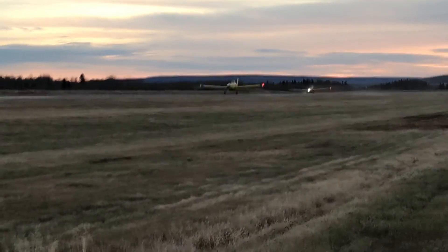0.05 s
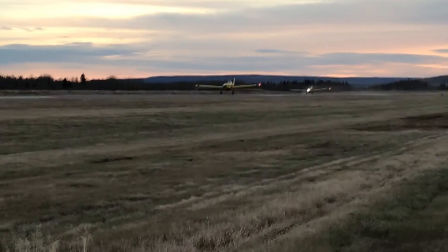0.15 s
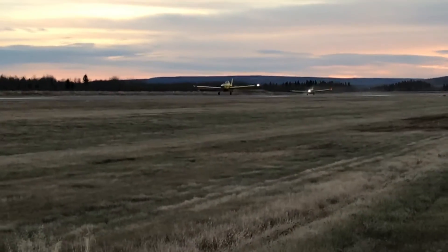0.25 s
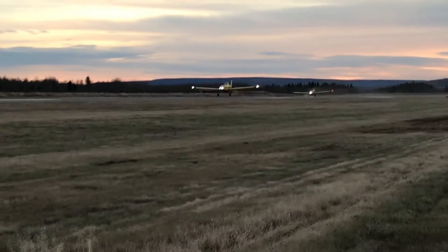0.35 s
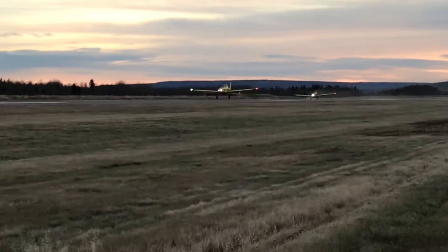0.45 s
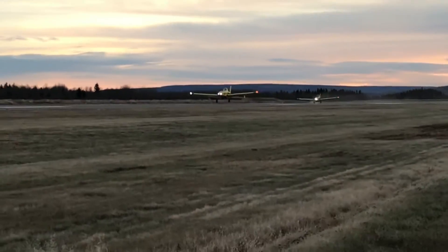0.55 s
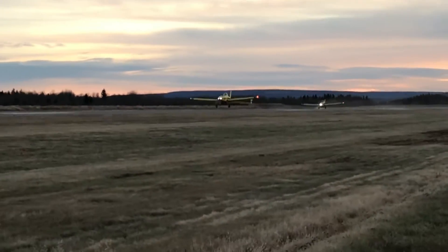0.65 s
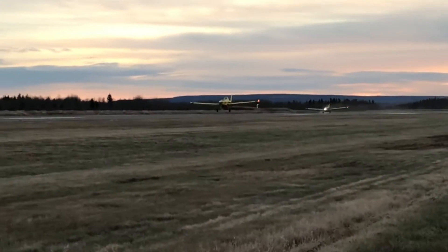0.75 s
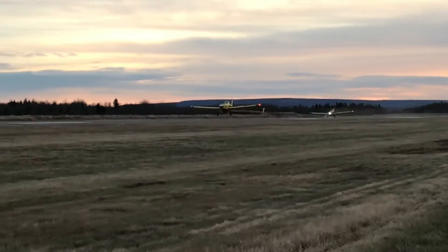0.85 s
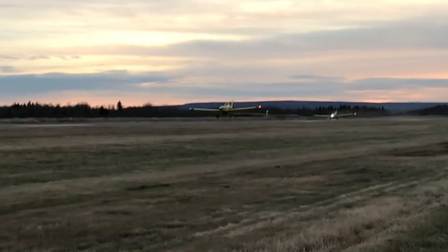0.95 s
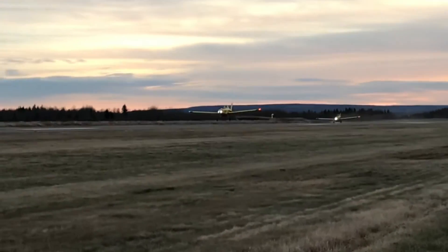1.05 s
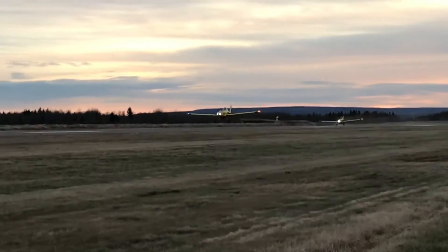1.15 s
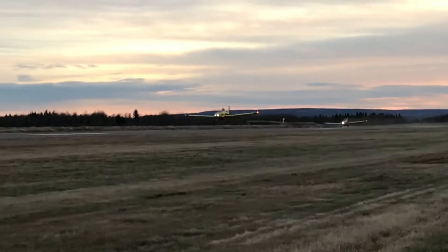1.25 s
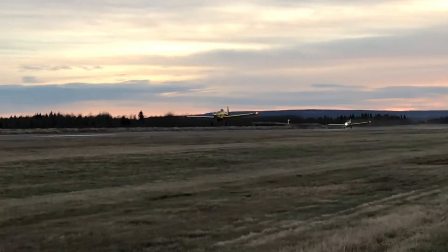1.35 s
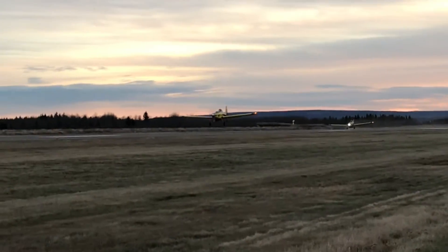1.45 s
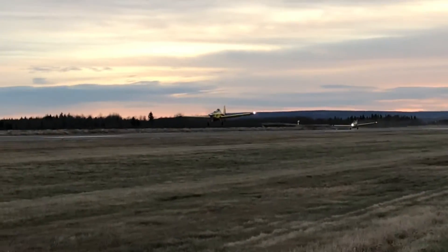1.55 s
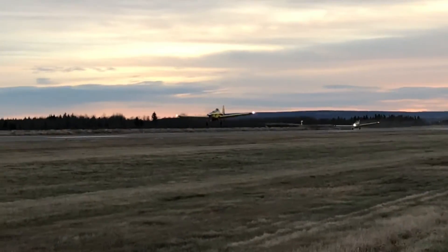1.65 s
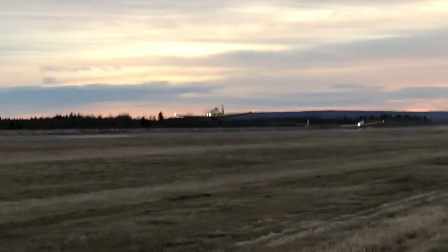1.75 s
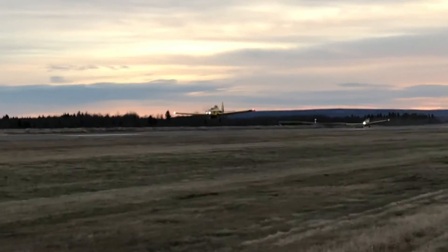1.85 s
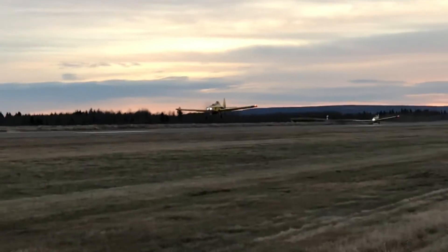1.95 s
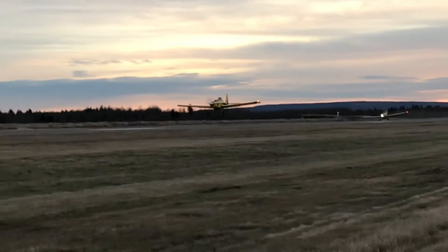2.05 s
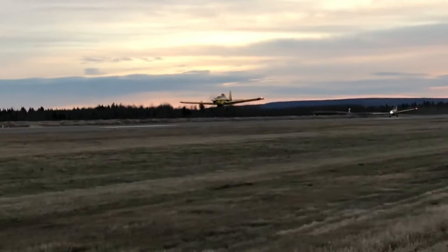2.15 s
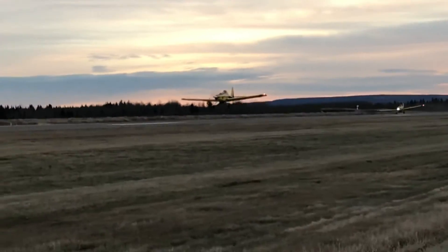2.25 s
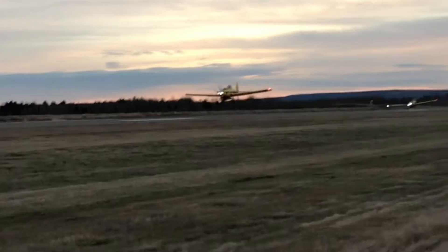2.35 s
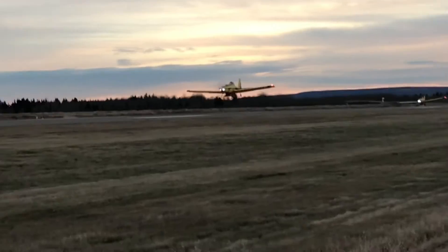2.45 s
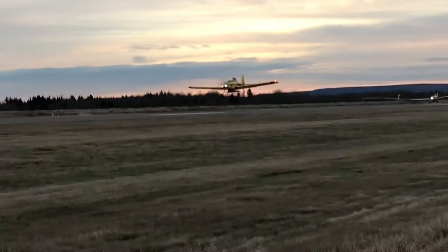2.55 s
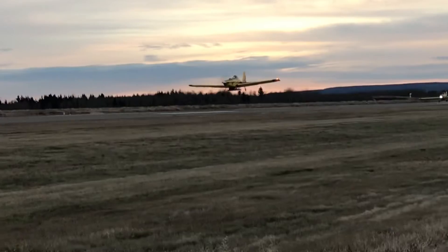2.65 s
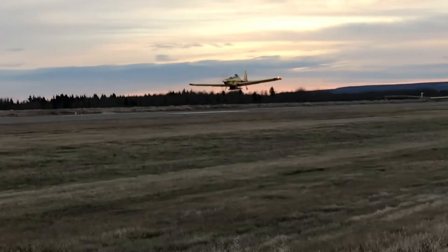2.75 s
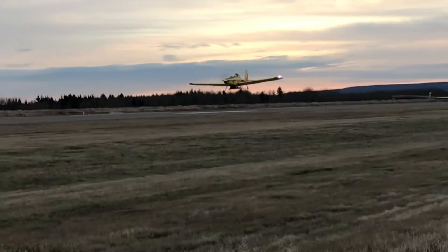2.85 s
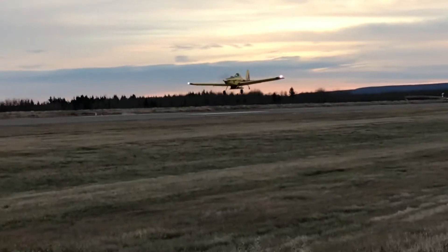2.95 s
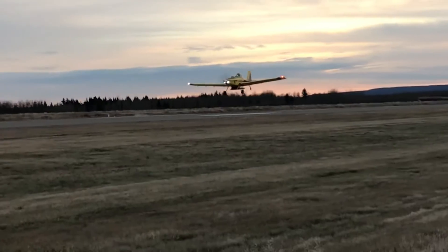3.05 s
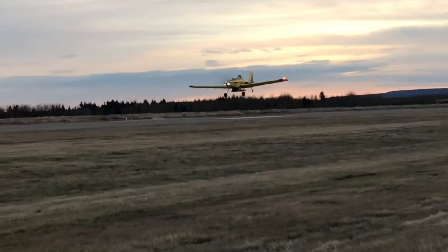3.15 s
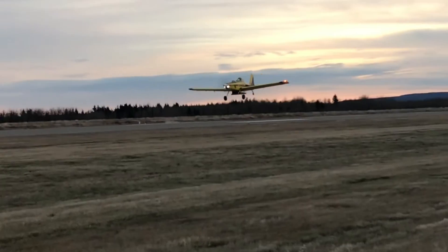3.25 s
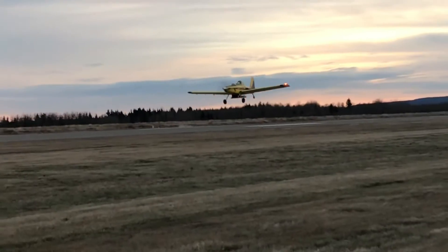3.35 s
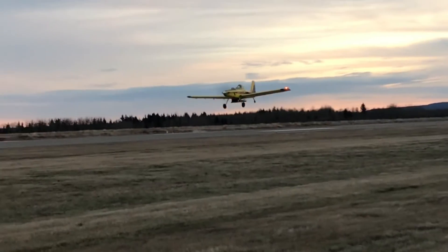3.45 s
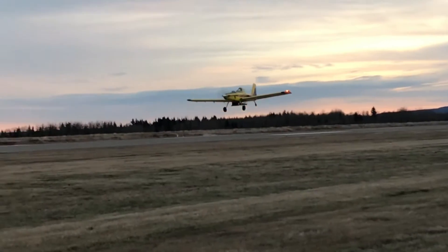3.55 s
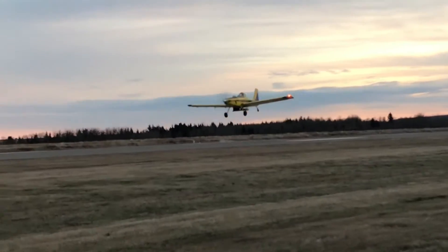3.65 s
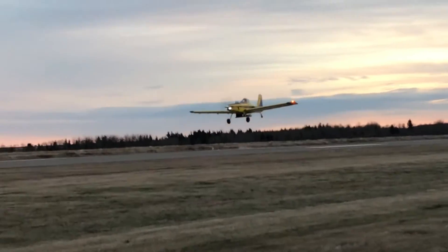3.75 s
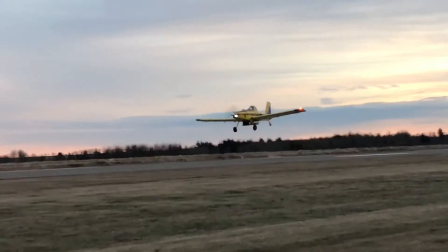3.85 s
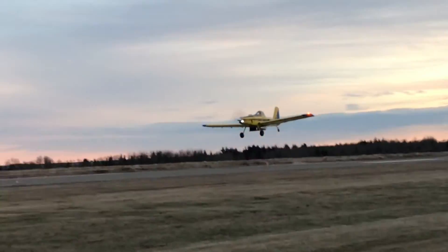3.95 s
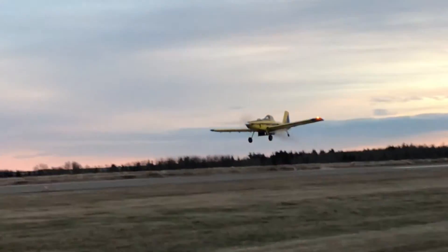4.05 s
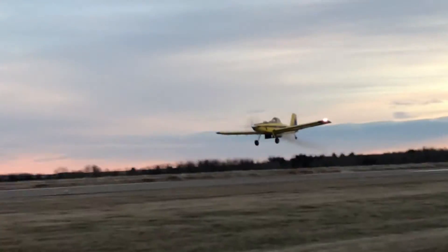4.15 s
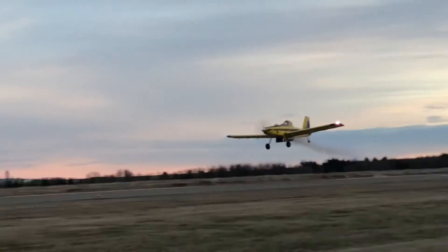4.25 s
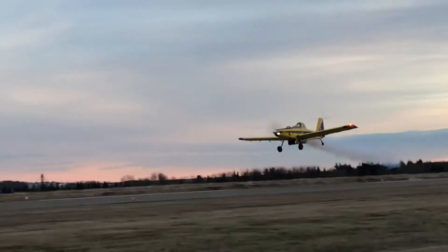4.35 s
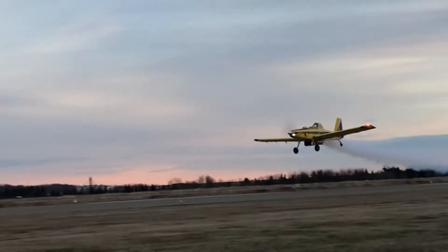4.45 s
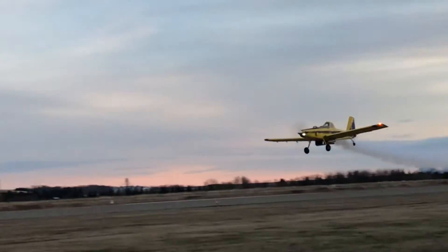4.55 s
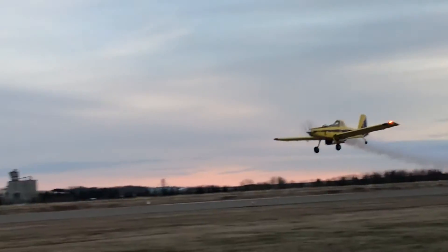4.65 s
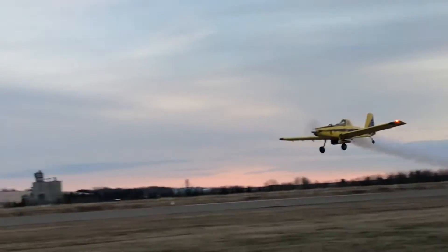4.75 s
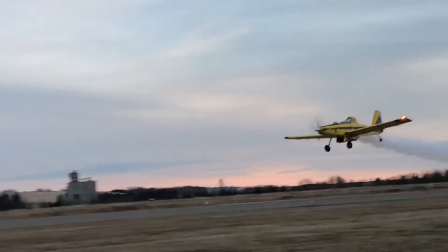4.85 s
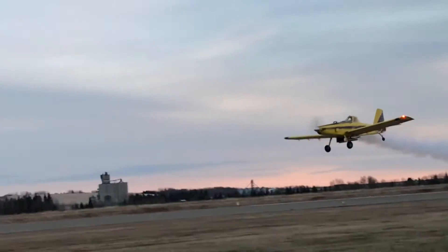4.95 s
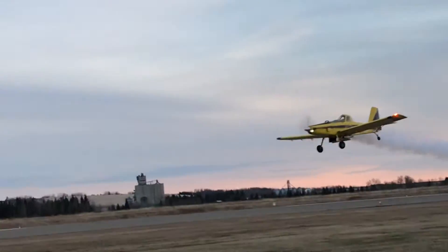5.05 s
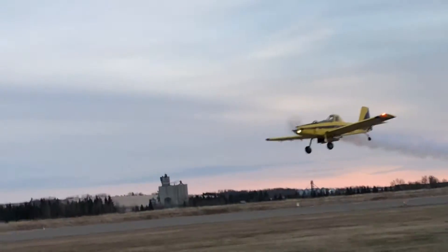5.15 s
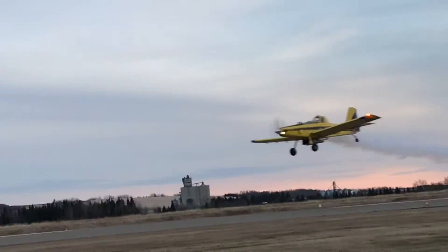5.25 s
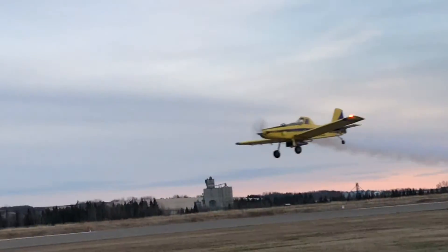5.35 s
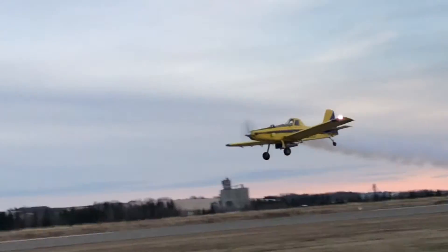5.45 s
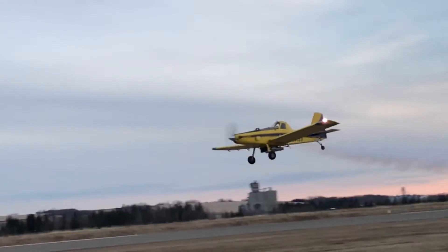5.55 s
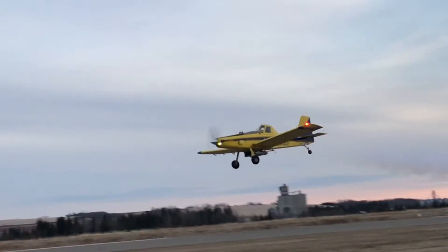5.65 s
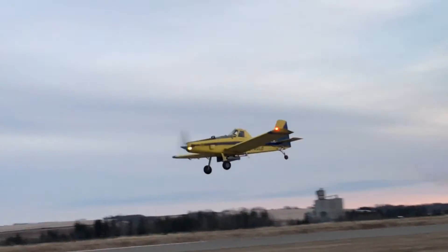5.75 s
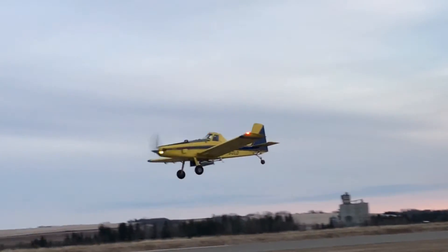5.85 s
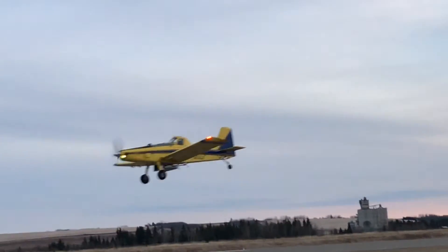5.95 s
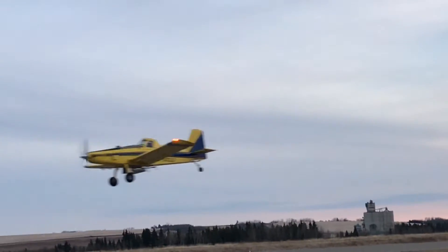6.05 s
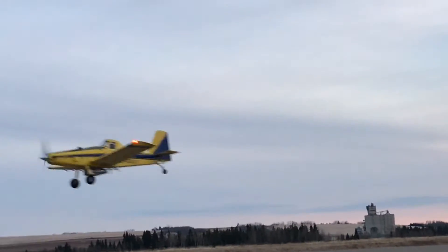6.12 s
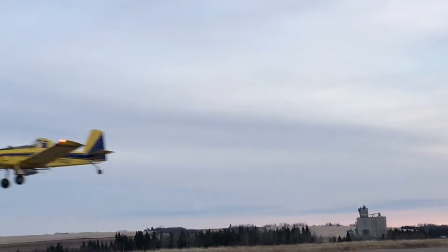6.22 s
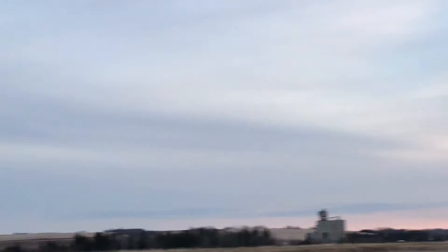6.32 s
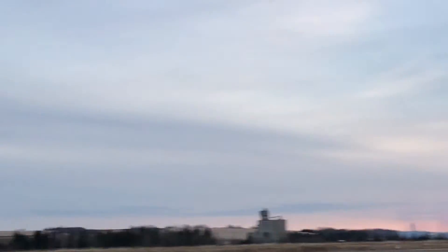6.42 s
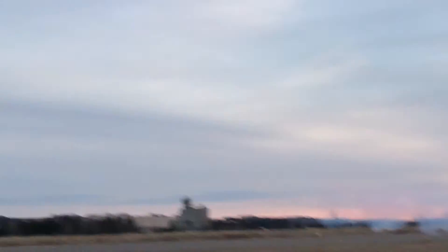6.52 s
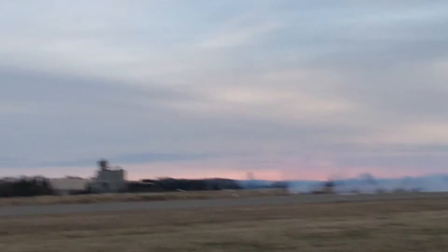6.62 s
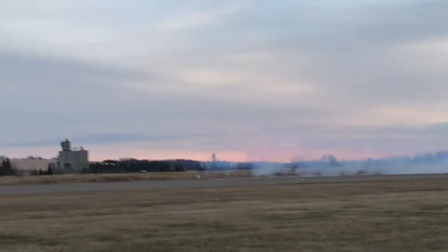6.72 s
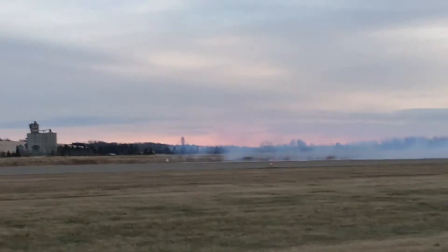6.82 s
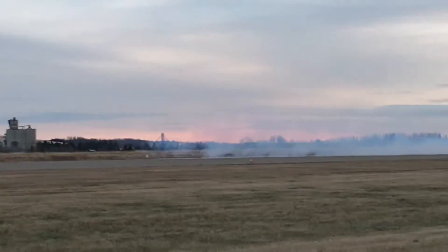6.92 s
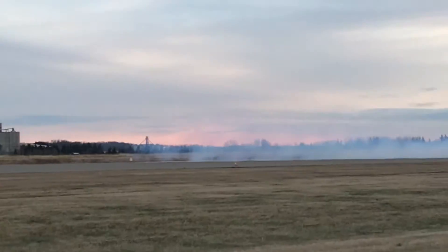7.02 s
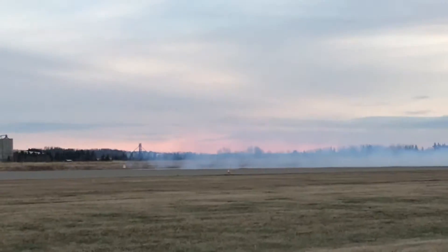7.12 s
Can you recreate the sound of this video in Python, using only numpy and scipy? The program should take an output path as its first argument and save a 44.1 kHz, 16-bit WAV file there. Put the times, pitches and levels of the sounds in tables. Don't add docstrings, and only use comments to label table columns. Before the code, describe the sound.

A small turboprop plane climbs out and flies past about sixty metres away. At first there is dull, wavering roar over deep rumble, with a faint propeller tone. The roar grows and brightens, combed by echoes off the grass. In the last two seconds a rapid buzzing blade slap and chopped high whine join in, the pitch dropping as it comes abreast. Open outdoor space, one small bass-shy microphone with slight hiss, no other sounds.

```python
import sys
import numpy as np
from scipy import signal
from scipy.fft import next_fast_len
from scipy.io import wavfile

SR = 44100
rng = np.random.default_rng(int(sys.argv[2]) if len(sys.argv) > 2 else 0)


def master(y):
    cut = np.clip(np.atleast_2d(y).T, -1, 1)
    pcm = np.round(cut * 32767)
    wavfile.write(sys.argv[1], SR, pcm.astype(np.int16))


def convert_level_to_amplitude(level_db):
    exponent = np.asarray(level_db, float) / 20
    return 10 ** exponent


N = 316638
SECONDS = np.arange(N) / SR


def rms_one(x):
    return x / np.sqrt(np.mean(x ** 2) + 1e-20)


def in_time(rows):
    s, *columns = np.transpose(rows)
    return [np.interp(SECONDS, s, c) for c in columns]


def at_hz(points, hz):
    point_hz, point_db = np.array(points).T
    return np.interp(np.log(hz), np.log(point_hz), point_db)


def drift(rate):
    r = np.exp(-80 * np.pi * rate / SR)
    slow = signal.lfilter([1], [1, -2 * r, r * r], rng.standard_normal(N // 40 + 2002))[2000:]
    return np.interp(np.arange(N) / 40, np.arange(len(slow)), rms_one(slow))


def bands(low_hz, high_hz):
    count = round(3 * np.log2(high_hz / low_hz))
    edges = np.geomspace(low_hz, high_hz, count + 1)
    white = rng.standard_normal((2, N + SR // 2))
    for k, (low, high) in enumerate(zip(edges, edges[1:])):
        sos = signal.butter(3, [low, high], "band", fs=SR, output="sos")
        band = signal.sosfilt(sos, white[k % 2])
        yield np.sqrt(low * high), band[SR // 2:]


def steady(spectrum):
    low_hz, high_hz = spectrum[0][0], spectrum[-1][0]
    return rms_one(sum(convert_level_to_amplitude(at_hz(spectrum, hz)) * band for hz, band in bands(low_hz, high_hz)))


BLADE_HZ = 128.21
SPEED, GAINING = 40.1, 0.766
LEVEL_S, NEAREST_M = 6.706, 60.66
SOUND_SPEED = 343


def flight():
    sent = np.arange(-2 * SR, N, 100) / SR
    to_go = LEVEL_S - sent
    ahead = SPEED * to_go - GAINING * to_go ** 2 / 2
    far = np.hypot(ahead, NEAREST_M)
    heard = sent + far / SOUND_SPEED
    doppler_hz = BLADE_HZ / np.gradient(heard, sent)
    return [np.interp(SECONDS, heard, c) for c in (doppler_hz, far, ahead / far)]


RUMBLE_NEAR_DB, RUMBLE_FOLLOWS = -25.5, 0.49
# frequency in Hz, level in dB per Hz.
RUMBLE = [(13, -58), (22, -23), (71, 0), (124, 3), (155, -9.5), (170, -14), (193, -18), (230, -24),
          (300, -47), (510, -120)]


def far_rumble(spread_db):
    return convert_level_to_amplitude(RUMBLE_NEAR_DB + RUMBLE_FOLLOWS * spread_db) * steady(RUMBLE)


LOW_NEAR_DB, GRASS_DB, CLEAR_M, CLEAR_SHARP = -21, -14, 150.5, 14.7
TOP_NEAR_DB, AIR_DB_PER_M = -47.5, -0.0925
POCKET_S = 0.17
# time in seconds, level in dB.
ROAR = [(0, -22), (1.5, -25.5), (2.3, -23.5), (3.6, -23.5), (4.5, -32.5), (5.5, -33.5), (6.4, -34),
        (7.18, -35.5)]
# frequency in Hz, level in dB per Hz.
EXHAUST = [(150, -15), (300, 0), (600, -2), (1200, -1), (2200, -10.5), (4000, -17), (7000, -29),
           (10000, -35.5), (12500, -40.5), (13500, -54.5), (15500, -46)]
# time in seconds, change of treble in dB.
POCKETS = [
    (.8, -4.5),
    (2.1, 2),
    (2.8, -7.5),
    (3.75, 3.5),
    (4.6, -3.5),
    (6.2, 1),
]


def exhaust(far, spread_db, alongside, gusts):
    roar_db, = in_time(ROAR)
    side_db = LOW_NEAR_DB + spread_db + GRASS_DB / (1 + (CLEAR_M / far) ** CLEAR_SHARP)
    air_db = TOP_NEAR_DB + spread_db + AIR_DB_PER_M * (far - NEAREST_M)
    air_db = air_db + sum(db * np.exp(-((SECONDS - s) / POCKET_S) ** 2) for s, db in POCKETS)
    side = side_db - roar_db + 0.5
    air = air_db - roar_db + 20
    out = 0
    for hz, band in bands(149.4, 15640):
        low_share = 1 / (1 + (hz / 700) ** 0.87)
        high_share = min(hz / 8000, 1.5) ** 1.145
        ground_db = -8 * (1 - 0.89 * alongside) * np.exp(-(np.log(hz / 220) / 0.36) ** 2)
        flutter_db = min(high_share, 1) * (2.4 * gusts + 1.0 * drift(14))
        band_db = at_hz(EXHAUST, hz) + low_share * side + high_share * air + ground_db + flutter_db
        out = out + convert_level_to_amplitude(band_db) * band
    return convert_level_to_amplitude(roar_db + 15) * signal.sosfilt(signal.butter(6, 13000, fs=SR, output="sos"), out)


def bounce(x, lag_ms, strength, turns, cut_hz):
    margin = 4000
    dull = np.pad(signal.filtfilt(*signal.butter(2, cut_hz, fs=SR), x), margin, "reflect")
    pair = signal.hilbert(dull, next_fast_len(len(dull)))
    at = margin + np.arange(N) - lag_ms * SR / 1000
    late = np.interp(at, np.arange(len(pair)), pair) * np.exp(2j * np.pi * turns)
    return x + np.clip(strength, 0, .95) * late.real


LATE_TURNS, EARLY_TURNS = .3, -.3
# time in seconds, lag of the late echo in ms,
# its strength from 0 to 1, lag of the early echo in ms, its strength from 0 to 1.
ECHOES = [(0, 1.04, 0.32, 0.62, 0), (1.0, 1, 0.39, 0.76, 0.5), (1.6, 1.083, 0.46, 0.66, 0.34),
          (2.8, 1.314, 0.36, 0.73, 0.45), (3.7, 1.61, 0.25, 0.78, 0.55), (4.6, 2.14, .28, 0.84, 0.65),
          (5.2, 2.49, 0.33, 1.004, 0.53), (5.8, 3.6, 0.04, 1.26, 0.7), (6.4, 3.6, 0.02, 1.42, 0.6),
          (7.18, 3.4, 0, 1.61, 0.45)]


def ground_echoes(roar, alongside):
    late_ms, late, early_ms, early = in_time(ECHOES)
    roar = bounce(roar, late_ms, late, LATE_TURNS, cut_hz=4600)
    roar = bounce(roar, early_ms, early * (1 - alongside), EARLY_TURNS, cut_hz=3600)
    return bounce(roar, early_ms, early * alongside, EARLY_TURNS, cut_hz=2100)


SLAP_SIDE_DB, SLAP_AHEAD_DB, SLAP_BEAM = -17.5, -62, 3.6
# time in seconds, level in dB.
TONE = [(0, -66), (.3, -38.5), (.6, -40), (1.2, -28), (2, -29.5), (2.4, -38.5), (3, -30), (3.4, -31.5),
        (3.6, -37.5), (3.8, -29), (4, -41), (4.3, -27.5), (5, -16), (5.48, -16), (5.84, -24), (6.1, -19),
        (6.5, -19.5), (7.18, -11.5)]
# level in dB of one multiple of the blade rate, from 2 up.
SLAP_DB = [-9.5, -7.5, -5, -7.5, -12, -24, -23, -20, -25, -28, -30, -32]


def propeller(turns, nose):
    tone_db, = in_time(TONE)
    slap_db = SLAP_SIDE_DB + SLAP_AHEAD_DB * np.abs(nose) ** SLAP_BEAM
    out = convert_level_to_amplitude(tone_db + 3 + .8 * drift(7)) * np.cos(turns + 3.7)
    for k, db in enumerate(SLAP_DB, 2):
        flip = np.pi * (k > 7)
        level = convert_level_to_amplitude(slap_db + 4.8 + db + .15 * k * drift(5))
        out = out + level * np.cos(k * turns + flip + .03 * k * drift(20))
    return out


WHINE_ORDER, UPPER_ORDER = 75.1, 89.1
# time in seconds, compressor whine in dB, upper whine in dB.
WHINES = [(2.88, -95, -100), (2.93, -82, -100), (3.3, -88, -100), (3.7, -76, -98), (4.2, -71, -93),
          (5, -66, -83), (5.5, -64, -71), (6.08, -53, -69), (6.7, -56, -67), (7.0, -63, -60),
          (7.18, -70, -63)]
# level far off in dB, level alongside in dB.
SIDEBANDS = [(-28, -18), (-21, -16), (-18, -15), (-18, -13), (-26, -13), (-24, -9), (-16, -6), (-2, -5),
             (-5, -5), (-18, -5), (-26, -8), (-30, -14)]


def turbine(turns, alongside, gusts):
    whine_db, upper_db = in_time(WHINES)
    whine_db = whine_db + 7 - 4 * alongside - 12 * (whine_db < -92)
    upper_db = upper_db + 8 + 5 * alongside
    whine_db = np.maximum(whine_db, -100 + 40 * alongside)
    upper_db = np.maximum(upper_db, -110 + 52 * alongside)
    out = 0
    for order, level_db, narrow in ((WHINE_ORDER, whine_db, 1), (UPPER_ORDER, upper_db, 2)):
        for k, (far_db, near_db) in enumerate(SIDEBANDS, -7):
            shape_db = far_db + alongside ** 1.5 * (near_db - far_db)
            line_db = narrow * shape_db + 3 * drift(5) + gusts
            out = out + convert_level_to_amplitude(level_db + line_db) * np.sin((order + k) * turns + .5 * drift(25))
    return out


def scene():
    blade_hz, far, nose = flight()
    turns = 2 * np.pi * np.cumsum(blade_hz) / SR
    alongside = np.clip((blade_hz.max() - blade_hz) / 6, 0, 1)
    spread_db = -20 * np.log10(far / NEAREST_M)
    gusts = .55 * drift(9)
    rumble = far_rumble(spread_db)
    roar = ground_echoes(exhaust(far, spread_db, alongside, gusts), alongside)
    blades = propeller(turns, nose)
    whine = turbine(turns, alongside, gusts)
    return (roar + blades + whine + rumble)[None]


HISS_DB = -78
# frequency in Hz, width in Hz, level in dB.
MIC = [
    (2630, 1030, -5),
    (3450, 700, 3),
    (4870, 570, -7.5),
    (5380, 810, 2),
]
# frequency in Hz, level in dB per Hz.
HISS = [(5000, -8), (8000, -4), (10500, -5), (12500, 0), (15700, -2)]


def microphone(air):
    air = signal.lfilter(*signal.butter(2, 32, "high", fs=SR), air)
    for hz, width_hz, db in MIC:
        ring = signal.lfilter(*signal.iirpeak(hz, hz / width_hz, fs=SR), air)
        air = air + (convert_level_to_amplitude(db) - 1) * ring
    return air + convert_level_to_amplitude(HISS_DB + 1.5 * drift(4)) * steady(HISS)


def roll_off(x):
    return signal.sosfilt(signal.butter(12, 15620, fs=SR, output="sos"), x)


def record(dry):
    mix = microphone(dry)
    return roll_off(mix)


dry = scene()
out = record(dry)
master(out)
```